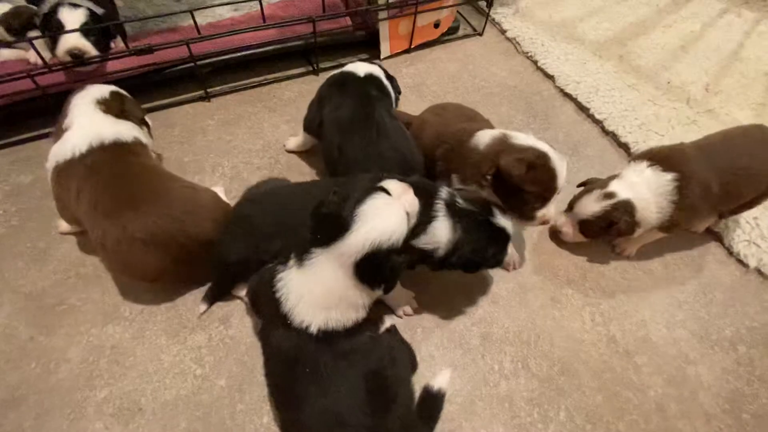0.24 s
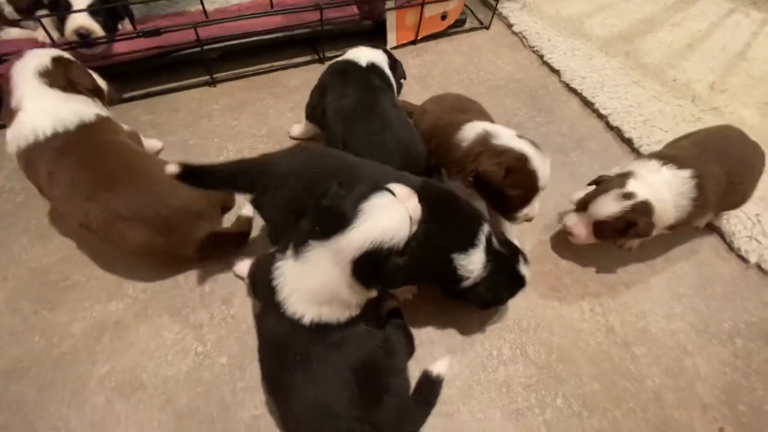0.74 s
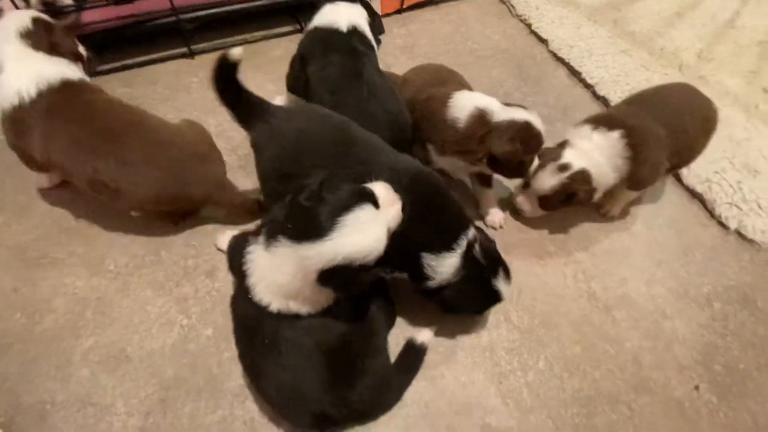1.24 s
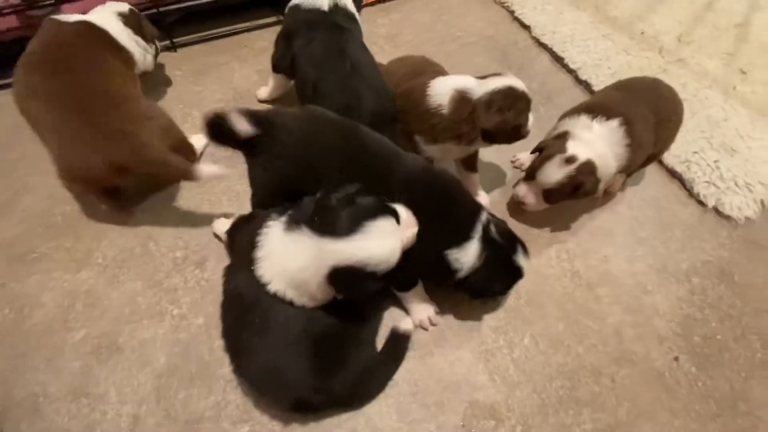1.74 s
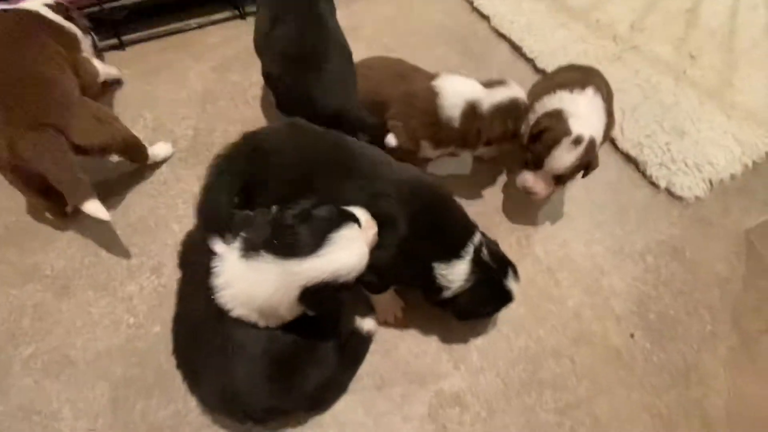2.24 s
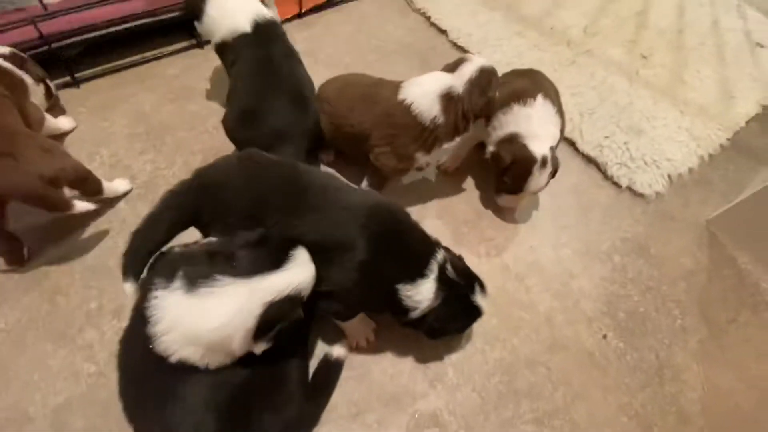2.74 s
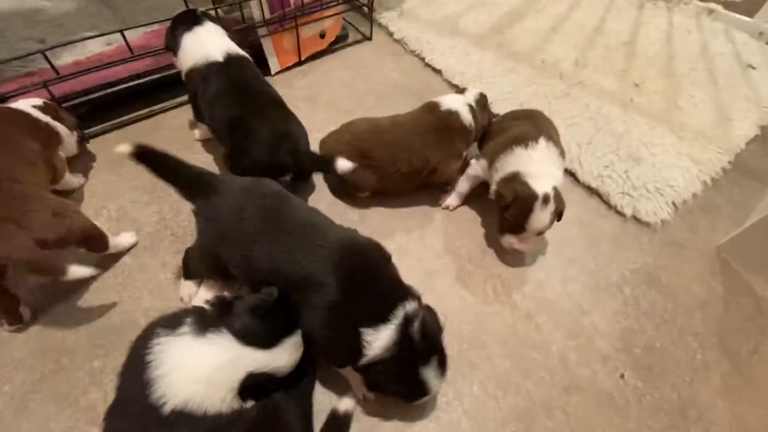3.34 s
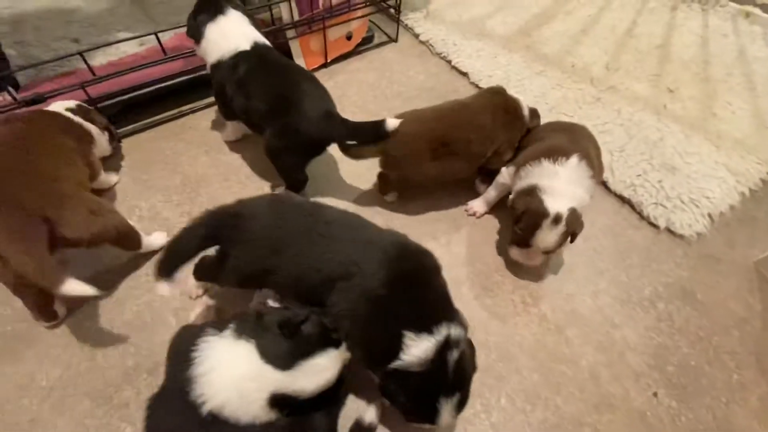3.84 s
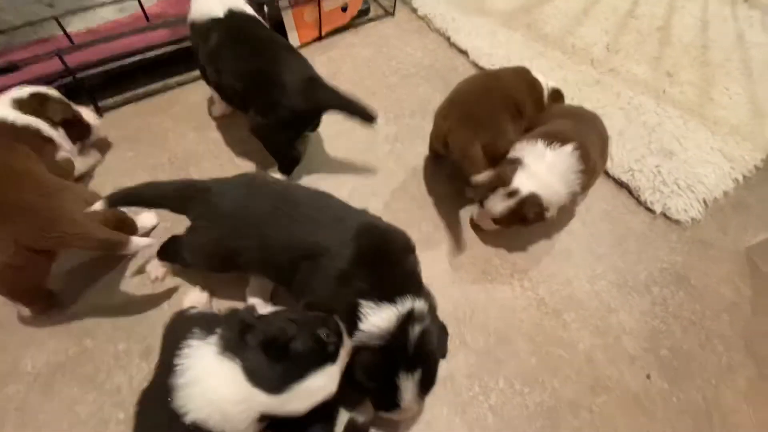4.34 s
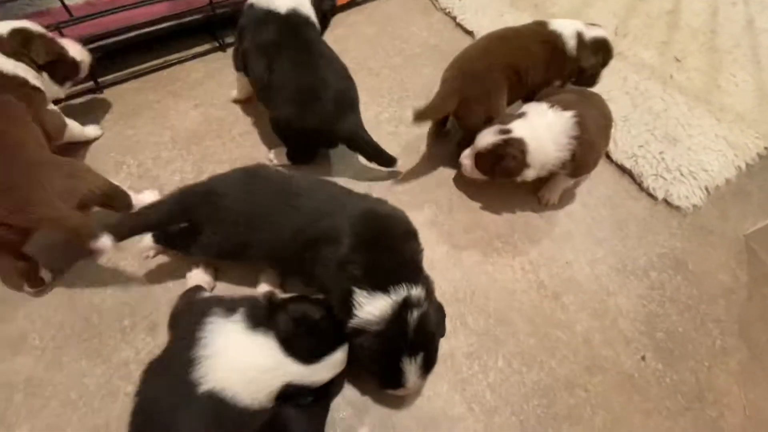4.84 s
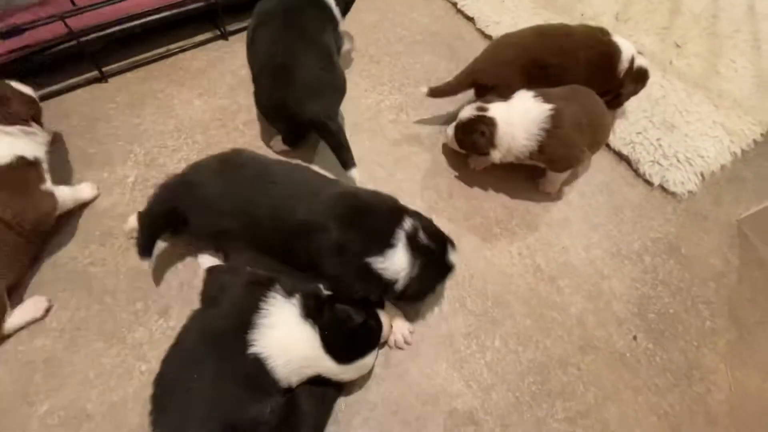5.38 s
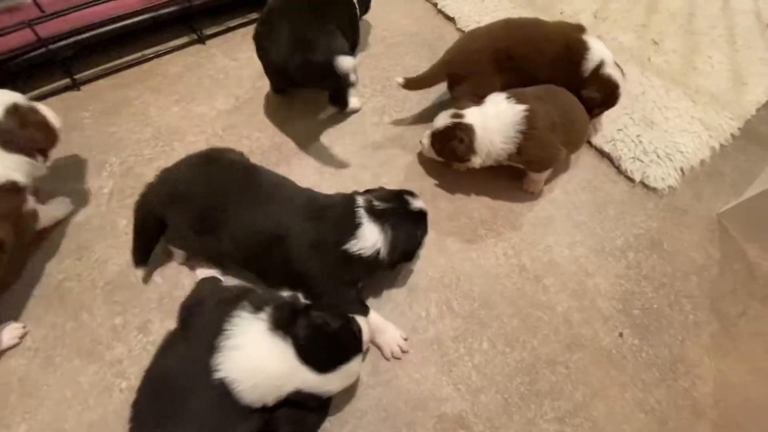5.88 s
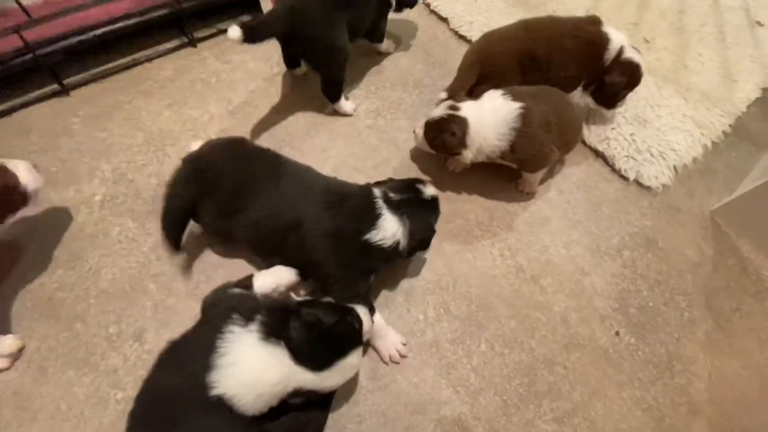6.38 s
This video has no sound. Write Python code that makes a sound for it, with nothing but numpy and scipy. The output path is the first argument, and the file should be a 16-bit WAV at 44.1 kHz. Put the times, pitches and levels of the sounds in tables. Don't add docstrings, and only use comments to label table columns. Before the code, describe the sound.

Close above a litter of very young puppies in a small quiet room, pads scuff and pat on carpet, claws tick and the floor thuds softly. A thin cry breaks early, then short yelps, grunts, a small bark and faint squeaks. A low rattling growl leads into whimpers, sudden high screams, a moan and a whine, with a heavy thump and another scream at the end.

```python
import sys
import numpy as np
from scipy import signal
from scipy.io import wavfile
from scipy.ndimage import uniform_filter1d

SR = 44100
rng = np.random.default_rng(int(sys.argv[2]) if len(sys.argv) > 2 else 0)


def natural_amplitude(level_db):
    exponent = np.asarray(level_db, float) / 20
    return 10 ** exponent


def master(y):
    cut = np.clip(np.atleast_2d(y).T, -1, 1)
    pcm = np.round(cut * 32767)
    wavfile.write(sys.argv[1], SR, pcm.astype(np.int16))


N = 291589
PORT_LAG_MS = 0.27


def evened(x):
    return x / np.sqrt(np.mean(x ** 2) + 1e-20)


def read(points, hz):
    f, value = np.transpose(points)
    return np.interp(np.log(hz + 1), np.log(f + 1), value)


def add(mix, s, sound, lag_ms=0, pan_db=0):
    for port, side in zip(mix, (0.5, -0.5)):
        start = max(round((s + side * lag_ms / 1000) * SR), 0)
        part = port[start:][:len(sound)]
        part += natural_amplitude(side * pan_db) * sound[:len(part)]


def resonate(x, hz, width):
    turn = np.exp(2j * np.pi * np.cumsum(hz * np.ones(len(x))) / SR)
    r = np.exp(-np.pi * width / SR)
    return 2 * (turn * signal.lfilter([1 - r], [1, -r], x / turn)).real


def voice(rows, throat, rough, breath_db):
    # centre in Hz, width in Hz, level in dB
    nose = [(6400, 900, -40), (11000, 2500, -50)]
    s, *columns = np.transpose(rows)
    t = np.arange(s[0], s[-1], 1 / SR)
    hz, effort_db, bright_db = (np.interp(t, s, c) for c in columns)
    shake, sway, air = rng.standard_normal((3, 8000))[:, :len(t)]
    shake, sway = (evened(uniform_filter1d(v, size=90)) for v in (shake, sway))
    rough = rough + 0.15 * np.exp((t - s[-1]) / 0.0079)
    turns = np.cumsum(hz * (1 + 0.12 * rough * shake)) / SR

    k = np.arange(1, 10)[:, None]
    size = natural_amplitude(read(throat, k * hz) + bright_db * np.minimum(np.log2(k), 1.15))
    size *= natural_amplitude(effort_db) / np.linalg.norm(size, axis=0)
    tone = (np.sqrt(2) * size * np.sin(2 * np.pi * k * turns)).sum(axis=0)

    puffs = air * (3.1 + np.exp(-(turns % 1) / 1.3))
    hiss = sum(natural_amplitude(db) * evened(resonate(resonate(puffs, f, w), f, w)) for f, w, db in nose)
    hiss *= np.clip(natural_amplitude(effort_db + 30.5), 0, 1)
    low_breath = evened(resonate(resonate(puffs, 800, 240), 730, 420))
    high_breath = evened(resonate(resonate(puffs, 1900, 900), 1900, 900))
    hiss += natural_amplitude(breath_db) * (low_breath + 0.15 * high_breath)

    edges = np.minimum(np.minimum(t - s[0], s[-1] - t) / 0.0033, 1)
    return s[0], (tone * (1 + rough * sway) + hiss * natural_amplitude(effort_db + 8.0)) * edges


def shaped(start, length, effort_db, hz, bright_db, shape):
    top, start_db, end_db, first, last, onset_db = shape
    return [(start, hz * first, effort_db + start_db, bright_db + onset_db),
            (start + np.clip(top, 0.05, 0.95) * length, hz, effort_db, bright_db),
            (start + length, hz * last, effort_db + end_db, bright_db)]


def calls():
    # frequency in Hz, level in dB
    deep = [(300, 1.5), (620, -3), (950, 0), (1280, -9), (1600, -17.5), (1900, -16), (2300, -42),
            (3300, -73)]
    shrill = [(380, 1), (620, 0.5), (830, 5), (1250, -18), (1700, -12.5), (2050, -25), (2450, -26),
              (3300, -62)]
    # left port lag in ms, left over right in dB
    near = (.07, 1.5)
    left = (-.4, 5.5)
    right = (.22, -2)
    far_left = (-.48, 3.5)
    # share of length before the top, start in dB, end in dB, start pitch factor,
    # end pitch factor, extra brightness at the start in dB per octave
    swell = (0.15, -11, -16, 1.09, 1.11, 12)
    die = (-0.1, 0.5, -13, 0.52, 0.96, 17)
    climb = (0.42, 5, 3.4, .94, 1.3, 3)
    fall = (.42, -10, -3, 1.0, .75, -8)

    # start in seconds, length in seconds, effort in dB, pitch in Hz,
    # mouth brightness in dB per octave
    grunts = [(2.653, 0.05, -37.5, 289.2, -9.5), (4.08, 0.054, -37, 301.2, -2.5),
              (5.168, 0.054, -39.5, 300, -11.5), (5.375, 0.048, -37.5, 294.7, -13.5),
              (5.575, .045, -39.5, 318.7, -7.5)]
    huffs = [(0.285, 0.071, -52, 293, -33), (1.69, 0.035, -45.5, 278, -26), (4.54, 0.033, -55.5, 321, -13),
             (4.975, 0.03, -45.5, 314, -19)]
    whimpers = [(5.785, 0.0444, -40.5, 361.5, 2), (6.45, 0.0465, -42, 359, 2)]
    squeaks = [(4.705, 0.059, -46.5, 850, 0), (4.85, 0.077, -50.5, 780, -10), (5.1, .065, -55.5, 847, -10)]
    # time in seconds, pitch in Hz, effort in dB,
    # mouth brightness in dB per octave
    yelps = [
        [(1.83, 359.6, -38, 10), (1.845, 392, -31.5, -3), (1.875, 415.8, -27, 3), (1.892, 449.5, -31.5, -7),
         (1.903, 326, -44.5, 24), (1.92, 276, -48, 28)],
        [(2.892, 372.6, -37.5, 12.5), (2.905, 375.7, -34, -1.5), (2.935, 416.1, -28, -5.5),
         (2.97, 382.5, -31, -2.5), (3.0, 369.5, -33.5, 0), (3.02, 304.8, -41, -9), (3.06, 273.6, -42, -7)],
    ]
    bark = [(4.318, 328, -43.5, 16), (4.33, 324.4, -37, 2), (4.36, 327.3, -38.5, -3),
            (4.39, 309.2, -38, 3.5), (4.41, 290, -43, -9), (4.43, 268, -45.5, -1)]
    moan = [(6.13, 260, -39.5, -14), (6.16, 271.8, -40.5, -3), (6.185, 282.2, -33, 0),
            (6.205, 295.3, -38, -14), (6.22, 330, -35.5, -16)]
    whine = [(6.305, 351.3, -36.5, 5), (6.325, 340.2, -34.5, 20), (6.347, 364, -31.5, 9.5),
             (6.375, 400, -41, -10.5), (6.41, 414, -51, 7)]
    broken = [
        [(1.262, 910, -44.5, -16), (1.335, 854.4, -38, 1)],
        [(1.315, 674, -40.5, -23), (1.333, 557, -39.5, -22)],
        [(1.334, 408.6, -31, -16), (1.364, 374, -54.5, 8), (1.39, 343, -50, -5)],
        [(1.385, 780, -46, -2), (1.401, 712, -48, 0.5), (1.45, 681, -57, -9)],
    ]
    windups = [
        [(6.008, 592, -36.5, 17), (6.032, 693, -31, 25.5)],
        [(6.565, 654, -43, 2), (6.582, 674, -31, 28)],
    ]
    screams = [
        [(6.033, 791.5, -27.5, 7), (6.059, 932.5, -26.5, -0.5), (6.072, 888, -21, 4)],
        [(6.073, 937, -23.5, -7), (6.087, 793, -21.5, 1), (6.1, 800, -32, 4)],
        [(6.108, 930, -41, -16), (6.145, 920, -43, -18)],
        [(6.583, 714, -33.5, 1.8), (6.61, 947, -26, 4.7)],
    ]

    short = [(grunts, swell, deep, 0.1, near), (huffs, die, deep, 0.1, near),
             (whimpers, climb, shrill, 0.33, far_left), (squeaks, fall, shrill, 0.04, left)]
    long = [(yelps, shrill, 0.08, right), ([bark], deep, 0.2, near), ([moan], shrill, 0.2, near),
            ([whine], shrill, 0.28, far_left), (broken, shrill, 0.08, left),
            (windups, shrill, 0.04, (-0.4, -2)), (screams, shrill, 0.04, right)]
    long += [([shaped(*row, shape) for row in rows], *pup) for rows, shape, *pup in short]
    return [(curve, *pup) for curves, *pup in long for curve in curves]


def growl():
    # time in seconds, effort in dB, mouth resonance in Hz
    rattle = [(5.42, -38, 790), (5.47, -49, 880), (5.53, -43, 848), (5.6, -46.5, 873), (5.65, -45.5, 870),
              (5.72, -46, 846), (5.78, -38, 780), (5.89, -46.5, 764), (5.98, -51, 744)]
    s, *columns = np.transpose(rattle)
    t = np.arange(s[0], s[-1], 1 / SR)
    effort_db, mouth_hz = (np.interp(t, s, c) for c in columns)
    shake, size, air = rng.standard_normal((3, len(t)))
    claps_per_s = 130 * (1 + 0.35 * evened(uniform_filter1d(shake, size=400)))
    turns = np.cumsum(claps_per_s) / SR
    claps = np.diff(np.floor(turns), prepend=0) * natural_amplitude(5 * size)
    drive = evened(claps) + 0.65 * air
    drive *= natural_amplitude(3 * evened(uniform_filter1d(shake[::-1], size=900)))
    mouth = evened(resonate(resonate(drive, mouth_hz, 84), mouth_hz, 114))
    mouth += natural_amplitude(-9.0) * evened(resonate(resonate(drive, 0.83 * mouth_hz, 56), 0.77 * mouth_hz, 90))
    chest = evened(resonate(resonate(drive, 256, 84), 356, 145))
    nose = evened(resonate(resonate(drive, 1860, 400), 1650, 600))
    sound = mouth + natural_amplitude(-13) * chest + natural_amplitude(-15.5) * nose
    return s[0], natural_amplitude(effort_db) * sound * signal.windows.tukey(len(t), 0.05)


def add_call(mix, s, sound, lag_ms, pan_db):
    low = signal.sosfiltfilt(signal.butter(4, 1100, fs=SR, output="sos"), sound)
    add(mix, s, low, lag_ms, pan_db)
    add(mix, s, sound - low, lag_ms / 2, pan_db)


def litter():
    pups = np.zeros((2, N))
    for rows, throat, rough, place in calls():
        add_call(pups, *voice(rows, throat, rough, breath_db=-27), *place)
    add_call(pups, *growl(), -0.52, 4.6)
    return pups


def knock(db, hz, t60, rise, grit, width):
    t = np.arange(0, t60, 1 / SR)
    puff = rng.standard_normal(20000)[:len(t)]
    puff = evened(resonate(resonate(puff, hz, width * hz), hz, 2 * width * hz))
    shape = natural_amplitude(-60 * t / t60) * (1 - np.exp(-t / rise))
    return natural_amplitude(db) * shape / shape.max() * (np.sin(2 * np.pi * hz * t) + grit * puff)


def add_thumps(boards, paws):
    # time in seconds, peak level in dB
    thumps = [(0.031, -54.5), (0.436, -48.5), (0.984, -51.5), (1.273, -46.5), (1.402, -49), (1.553, -50.5),
              (1.699, -44), (1.802, -42.5), (2.058, -46.5), (2.327, -38.5), (2.39, -42), (2.72, -43.5),
              (3.023, -39.5), (3.09, -48), (3.327, -43.5), (3.369, -42), (3.451, -50), (3.56, -51),
              (4.385, -47.5), (5.136, -54.5), (5.199, -48.5), (5.474, -51.5), (5.725, -45.5), (5.808, -46),
              (5.871, -53), (5.96, -47), (6.1, -46), (6.321, -48), (6.489, -35)]
    steps = [.826, 2.178, 4.058, 4.194, 4.259, 5.014, 5.279, 6.181]
    landings = thumps + [(s, -55) for s in steps]
    for (s, db), spread in zip(landings, rng.uniform(-1.1, 1, size=50)):
        board_hz = 78.3 * (1 + 0.17 * spread)
        boom = knock(db + 3.0, board_hz, t60=0.3, rise=0.0041, grit=0.38, width=0.64)
        add(boards, s, boom, 1.15 * spread, 4.6 * spread)
        rattle = knock(db - 19.5, 300, t60=0.19, rise=0.0018, grit=1.35, width=0.46)
        add(paws, s, rattle, 0.2)


def add_pats(paws):
    # time in seconds, peak level in dB, ring in Hz
    pats = [(0.055, -53.5, 386), (0.114, -54.5, 314), (0.277, -45, 511), (0.382, -46.5, 255.6),
            (0.437, -54, 320), (0.498, -59, 290), (0.579, -51.5, 478), (0.811, -71, 204),
            (0.979, -54.5, 193), (1.075, -44.5, 296), (1.562, -54, 272), (1.792, -39.5, 192),
            (2.073, -47, 278), (2.309, -32.5, 298), (3.348, -53.5, 318), (5.23, -28.5, 324)]
    for s, db, hz in pats:
        add(paws, s, knock(db - 7.5, hz, t60=0.039, rise=0.0012, grit=1.0, width=0.85), 0.1)
        add(paws, s, knock(db - 18, 2.84 * hz, t60=0.029, rise=0.00027, grit=1.52, width=1.97), 0.1)


def add_ticks(paws):
    # time in seconds, peak level in dB, centre in Hz
    ticks = [(0.021, -56.5, 4600), (0.1108, -53, 3120), (0.1927, -61, 3800), (0.262, -58, 11200),
             (0.3229, -53, 2850), (0.9636, -53.5, 2800), (1.075, -59, 2520), (1.165, -63, 7600),
             (1.335, -53, 10600), (1.5, -60.5, 11500), (1.5621, -46, 2950), (1.6837, -51, 3940),
             (1.7993, -54, 2360), (1.9433, -46, 6260), (2.0339, -48, 2430), (2.2205, -53.5, 4070),
             (2.8988, -61, 2730), (3.312, -58, 2920), (3.929, -54, 11050), (4.304, -47, 10600),
             (4.7065, -51.5, 11000), (5.228, -52, 2660), (5.4807, -49, 2510), (5.5185, -50.5, 2580),
             (5.691, -49.5, 11300), (5.8676, -47, 5800), (5.9322, -53, 11700), (6.3162, -47.5, 3460),
             (6.4767, -51, 11300), (6.581, -62, 2510)]
    for s, db, hz in ticks:
        tick = knock(db - 7, hz, t60=0.012, rise=0.0001, grit=2.5, width=2.2)
        add(paws, s, tick, PORT_LAG_MS)


def noise(shape, patchy_db, size=512):
    # frequency in Hz, likeness of left and right from 0 to 1
    likeness = [(60, .93), (300, .8), (1000, .6), (4000, .6), (9000, .88)]
    frames, hz = 4 * N // size + 5, np.fft.rfftfreq(size, 1 / SR)
    a, b, c, d, patches = rng.standard_normal((frames, len(hz), 5)).T
    patches = uniform_filter1d(patches, size=size // 36, axis=0)
    patches = evened(uniform_filter1d(patches, size=4096 // size, axis=1))
    same = np.clip(read(likeness, hz), 0, 1)[:, None]
    right = a + 1j * b
    late = np.exp(-2j * np.pi * hz * PORT_LAG_MS / 1000)[:, None]
    left = same * late * right + np.sqrt(1 - same ** 2) * (c + 1j * d)
    z = np.array([left, right])
    inside = (hz >= shape[0][0]) & (hz <= shape[-1][0])
    z *= natural_amplitude(read(shape, hz)[:, None] + patchy_db * patches) * inside[:, None]
    return evened(signal.istft(z, nperseg=size, noverlap=3 * size // 4)[1][:, :N])


def strokes(rows, linger):
    t = np.arange(0, N + 64, 64) / SR
    top, db, rise, fall = np.transpose(rows)[:, :, None]
    away = np.where(t < top, (top - t) / rise, (t - top) / fall) / linger
    level = np.linalg.norm(natural_amplitude(db - 20 * away ** 1.07), axis=0)
    return np.interp(np.arange(N) / SR, t, level)


def scuffs():
    # top in seconds, level in dB, rise in seconds, fall in seconds
    drags = [(.122, -64, .035, 0.045), (.385, -65, 0.21, 0.21), (.505, -56.5, 0.1, 0.073),
             (.83, -62.5, 0.052, 0.067), (1.0, -72, 0.41, 0.14), (1.16, -73.5, .3, 0.27),
             (1.293, -56.5, 0.065, 0.094), (1.626, -57, .09, .07), (1.696, -67, 0.069, 0.1),
             (1.886, -66.5, 0.15, 0.46), (2.178, -66.5, 0.061, 0.35), (2.422, -63.5, 0.089, 0.078),
             (2.756, -62.5, 0.12, 0.11), (3.042, -54, 0.09, .085), (3.421, -72.5, 0.3, 0.12),
             (3.936, -71.5, 0.16, 0.043), (4.046, -68.5, 0.027, 0.32), (4.313, -57, 0.029, 0.14),
             (4.586, -60, 0.046, 0.041), (4.655, -63.5, 0.047, 0.039), (4.954, -71, 0.2, 1),
             (5.236, -65, 0.28, .25), (5.5, -72, .5, 0.78), (5.757, -53, 0.086, 0.078),
             (6.089, -59, 0.12, 0.084), (6.19, -63.5, 0.48, 0.13), (6.323, -57.5, 0.048, 0.16),
             (6.486, -59, 0.068, 0.09), (6.61, -61, 0.059, .1)]
    rubs = [(.09, -71, 0.24, 0.022), (2.15, -58, 0.13, 0.15), (2.422, -56, 0.063, 0.086),
            (2.91, -55, 0.058, 0.18), (6.423, -61, 0.042, 0.11)]
    # frequency in Hz, level in dB per Hz
    fine_colour = [(1470, -45.5), (2500, -27), (5560, -3), (9290, -11.5), (10900, -4), (13200, -11),
                   (14400, -12.5), (16000, -9)]
    coarse_colour = [(100, -32), (200, -3), (351, -9.5), (837, -20), (1000, -14), (2310, -7.5),
                     (7500, -38.5), (9750, -74)]
    grit = natural_amplitude(1.45 * evened(uniform_filter1d(rng.standard_normal(N), size=150)))
    grit *= natural_amplitude(3.2 * evened(uniform_filter1d(rng.standard_normal(N), size=1400)))
    coarse = np.hypot(natural_amplitude(-1.6) * strokes(drags, 1.09), strokes(rubs, 0.83))
    rub = strokes(drags, 1) * noise(fine_colour, 2.0) + coarse * noise(coarse_colour, 3.0)
    return evened(grit) * rub


def room(x):
    # frequency in Hz, time to fall by 60 dB in seconds
    decay = [(80, 0.33), (300, .25), (700, 0.22), (2000, 0.27), (8000, 0.16)]
    taps = np.zeros((2, SR // 2))
    at = np.arange(200, SR // 2 - 20, 20) + rng.integers(0, 20, (2, (SR // 2 - 201) // 20))
    np.put_along_axis(taps, at, rng.choice([-1., 1.], at.shape), 1)
    hz, t, z = signal.stft(taps, SR, nperseg=256)
    z[1] = np.where(hz[:, None] < 400, 0.69 * z[0] + 0.97 * z[1], z[1])
    tail = signal.istft(z * natural_amplitude(-60 * t / read(decay, hz)[:, None]), SR, nperseg=256)[1]
    return signal.fftconvolve(x.mean(0)[None], tail / np.linalg.norm(tail[0]), axes=1)[:, :N]


def still_air():
    # frequency in Hz, level in dB per Hz
    hush = [(24, -6.5), (60, 1.5), (98, 3), (135, -13), (330, -14.5), (900, -21), (6720, -36.5),
            (16000, -37.5)]
    return natural_amplitude(-66) * noise(hush, 3.0, size=2048)


def scene():
    pups = litter()
    paws, boards = np.zeros((2, 2, N))
    add_thumps(boards, paws)
    add_pats(paws)
    add_ticks(paws)
    wet = natural_amplitude(-5.5) * room(pups) + natural_amplitude(-2.5) * room(paws)
    return pups + paws + boards + wet + scuffs() + still_air()


def low_pass(x):
    return signal.sosfilt(signal.butter(12, 16510, fs=SR, output="sos"), x)


def record(dry):
    # centre in Hz, width in Hz, depth in dB
    notches = [(9350, 170, -6), (13200, 520, -26)]
    hz = np.linspace(0, SR / 2, 513)
    colour_db = sum(db * np.exp(-((hz - f) / w) ** 4) for f, w, db in notches) - 45 * (hz > 15850)
    taps = signal.firwin2(511, hz, natural_amplitude(colour_db), fs=SR)
    mix = signal.oaconvolve(dry, taps[None], "same")
    return low_pass(mix)


dry = scene()
out = record(dry)
master(out)
```